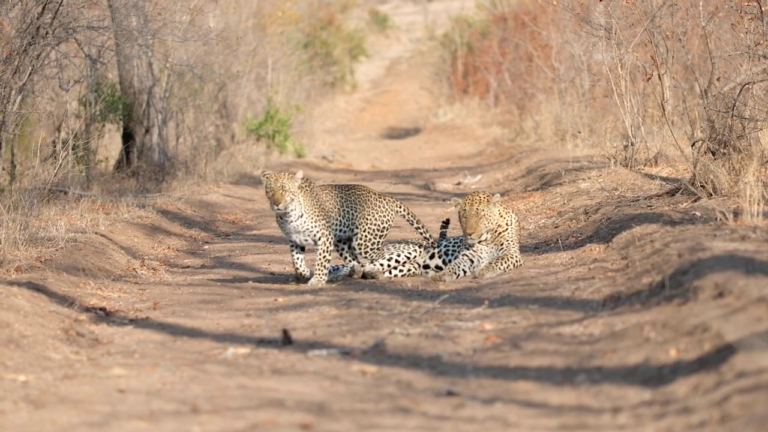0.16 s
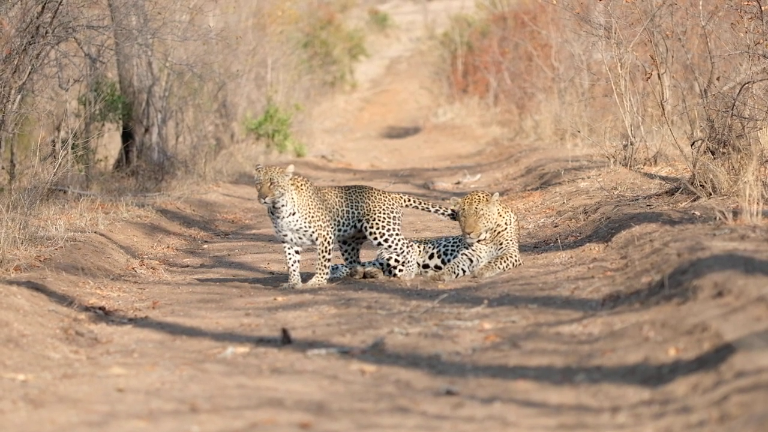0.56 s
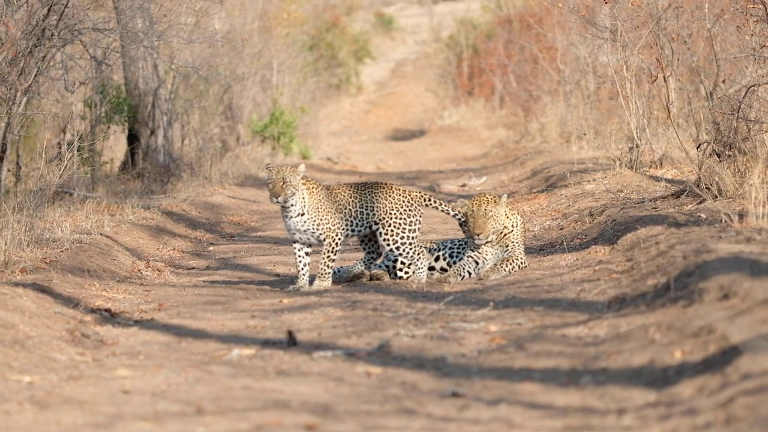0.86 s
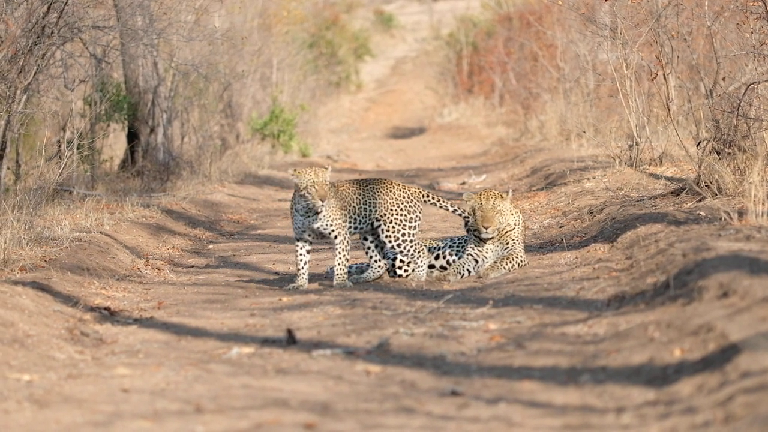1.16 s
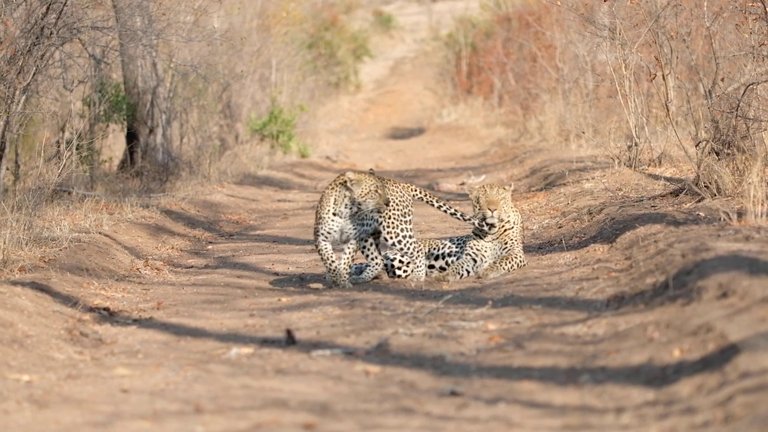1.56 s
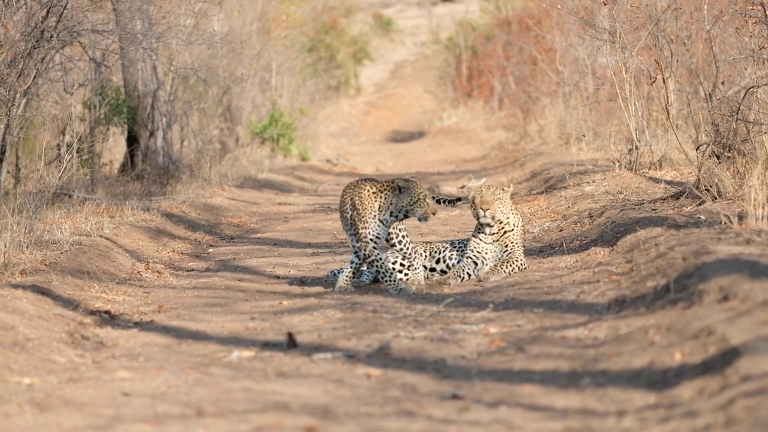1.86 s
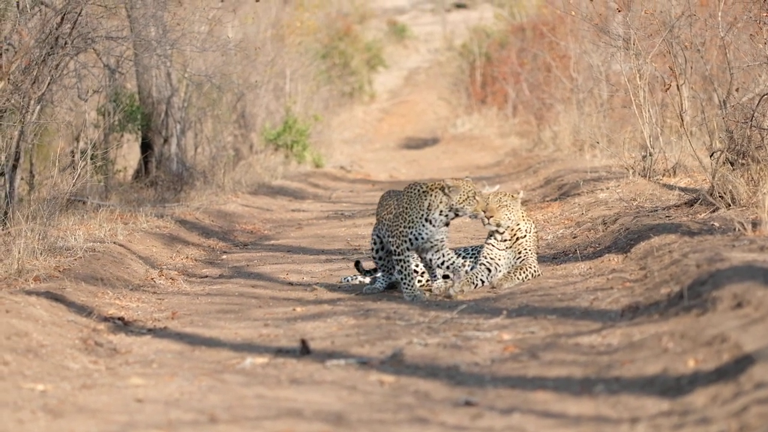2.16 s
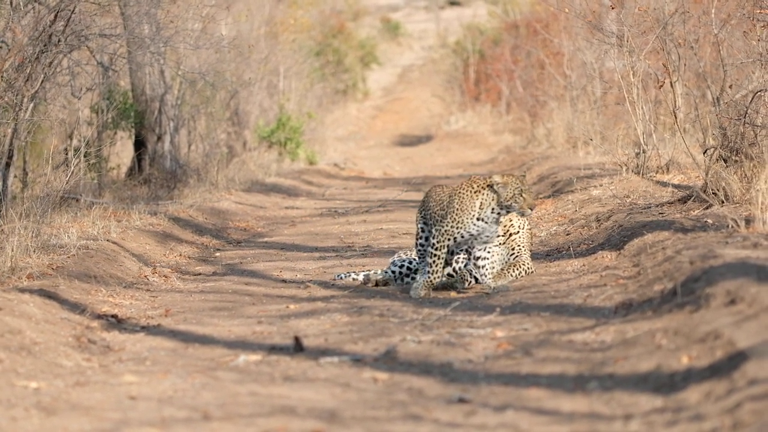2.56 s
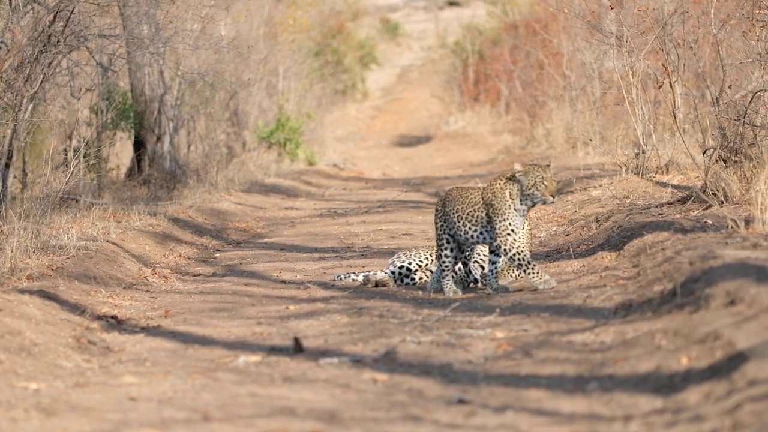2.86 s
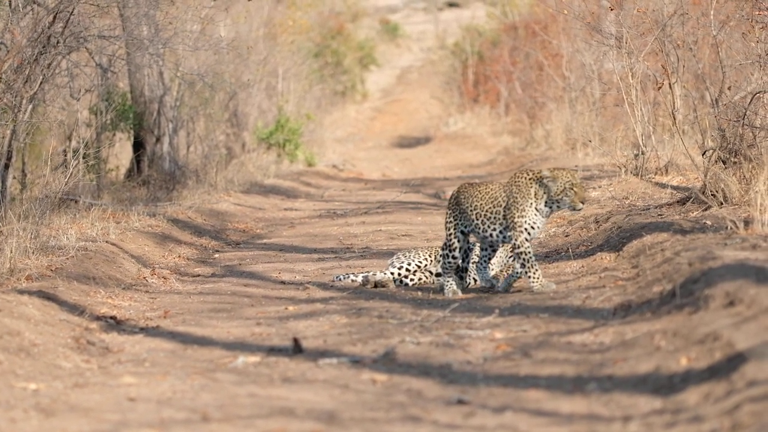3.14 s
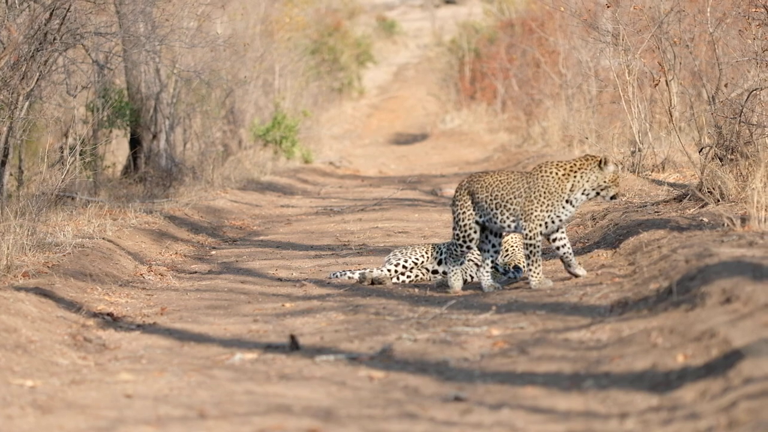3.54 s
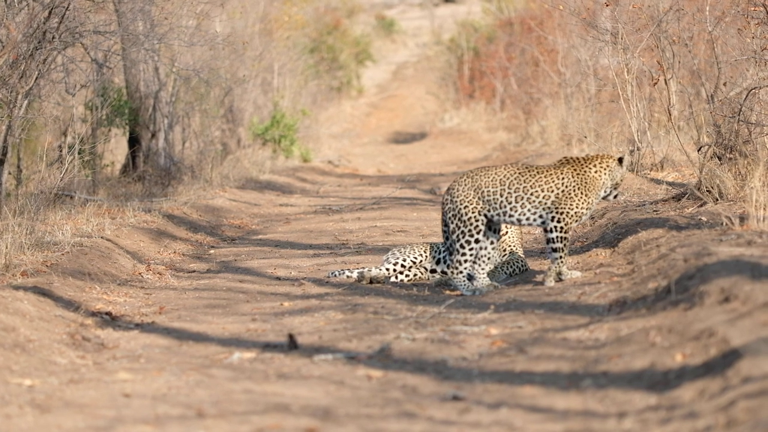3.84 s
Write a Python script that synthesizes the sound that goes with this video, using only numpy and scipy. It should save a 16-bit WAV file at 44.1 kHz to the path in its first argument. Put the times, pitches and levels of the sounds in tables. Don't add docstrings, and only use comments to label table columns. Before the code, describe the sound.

A leopard growls on a dry bush track: distinct low, chesty throat beats with open-mouth rasp from 0 to 1.3 s, a quick grunt near 1.55 s, then a slightly lower growl from 1.95 to 2.85 s. A close camera button clicks at 0.7 s; shutter bursts clatter at 0.85-1.2 and 1.8-2.2 s. Soft wind puffs become strong, mostly left-sided microphone buffeting after 2.9 s, over faint hiss and tiny bird chirps.

```python
import sys
import numpy as np
from scipy import signal
from scipy.fft import rfft, irfft
from scipy.io import wavfile

SR = 44100
rng = np.random.default_rng(int(sys.argv[2]) if len(sys.argv) > 2 else 0)


def wav_out(sig):
    wavfile.write(sys.argv[1], SR, np.round(np.clip(np.atleast_2d(sig).T, -1, 1) * 32767).astype(np.int16))


def voltage_ratio(decibels):
    exponent = np.asarray(decibels, float) / 20
    return 10 ** exponent


N = 176400


def rms_one(x):
    return x / np.sqrt(np.mean(x ** 2) + 1e-20)


def in_time(rows):
    s, *columns = np.transpose(rows)
    return [np.interp(np.arange(N) / SR, s, column) for column in columns]


def filtered(x, hz, kind="low", order=2):
    return signal.sosfilt(signal.butter(order, hz, kind, fs=SR, output="sos"), x)


def drift(rate):
    r = np.exp(-80 * np.pi * rate / SR)
    noise = rng.standard_normal(N // 40 + 2002)
    slow = signal.lfilter([1], [1, -2 * r, r * r], noise)[2000:]
    return np.interp(np.arange(N) / 40, np.arange(len(slow)), rms_one(slow))


def ring(x, hz, t60):
    r, w = voltage_ratio(-60 / (t60 * SR)), 2 * np.pi * hz / SR
    return signal.lfilter([0, np.sin(w)], [1, -2 * r * np.cos(w), r * r], x + 1e-18)


# (time [s], beats so far [count])
FIRST_GROWL = [(.025, 0), (.168, 3), (.293, 6), (.363, 8), (.44, 10), (.503, 11), (.845, 18), (1.079, 23),
               (1.296, 27)]
# (time [s], beats so far [count])
SECOND_GROWL = [(1.946, 0), (2.061, 2), (2.168, 4), (2.205, 5), (2.381, 8), (2.532, 11), (2.685, 14),
                (2.8, 16), (2.855, 17)]
# (time [s], beats so far [count])
GRUNT_BEATS = [
    (1.545, 0),
    (1.557, 1),
    (1.584, 2),
    (1.62, 3),
    (1.665, 4),
]
# (time [s], beat peak level [dB], open-mouth rasp level [dB])
THROAT_EFFORT = [(0, -36.5, -56), (.17, -26, -35.5), (.22, -28, -32), (.37, -20.5, -38), (.45, -30, -43.5),
                 (1.03, -27.5, -34), (1.3, -34.5, -59), (1.545, -35, -43), (1.557, -26, -35),
                 (1.585, -25, -33.5), (1.67, -63, -30), (1.95, -41.5, -35), (2.15, -41.5, -46),
                 (2.33, -36.5, -55.5), (2.5, -45, -50), (2.68, -37.5, -40), (2.86, -34, -36)]
# (frequency [Hz], level [dB], ring time t60 [s])
CHEST_MODES = [(207.6, -2.5, 0.065), (291.5, -16, 0.023), (148, -45, .05)]
# (frequency [Hz], level [dB], ring time t60 [s])
MOUTH_MODES = [(1560, -6, .025), (1900, 0, .035), (2330, -2, .025), (2750, -4, .02), (3250, -5, .018)]


def cat():
    flap_delay_s, flap_db, breath_db = .0105, -12, -40
    beat_db, rasp_db = in_time(THROAT_EFFORT)
    out = 0
    for calls, sag_share in (((FIRST_GROWL, GRUNT_BEATS), 0), ((SECOND_GROWL,), .06)):
        beats = np.zeros(N)
        for call in calls:
            s, count = np.transpose(call)
            at = (np.interp(np.arange(count[-1] + 1), count, s) * SR).astype(int)
            beats[at] = voltage_ratio(rng.standard_normal(len(at)))
        beats *= voltage_ratio(beat_db)
        puff = signal.lfilter([1], [1, -np.exp(-1 / (0.01 * SR))], beats)

        push = beats + voltage_ratio(flap_db) * np.roll(beats, int(flap_delay_s * SR))
        push = push + voltage_ratio(breath_db) * puff * rng.standard_normal(N)
        push = filtered(push, 400, order=4)
        push = filtered(push, 74, "high")
        for hz, db, t60 in CHEST_MODES:
            out = out + voltage_ratio(db) * ring(push, hz * (1 - sag_share), t60)

        rasp = voltage_ratio(rasp_db) * (beats + 0.041 * puff * rng.standard_normal(N))
        for hz, db, t60 in MOUTH_MODES:
            out = out + voltage_ratio(db) * ring(rasp, hz, t60)
    return out


def rattle(strikes, length, modes, tilt_db=0.0, rise=0.25):
    longest_ring_s, ring_cycles, detune_share, fresh_share = .016, 24, .02, .5
    u = np.arange(SR // 8) / SR / length
    shape = np.minimum(u / rise, 1) * np.exp(-np.maximum(u - 1, 0) * 2)
    sounds = 0
    for hz, db, t60 in modes:
        shared = rng.standard_normal(len(u))
        fresh = rng.standard_normal((len(strikes), len(u)))
        shake = shape * (shared + fresh_share * fresh)
        tuned_hz = hz * (1 + detune_share * rng.standard_normal())
        ringing = ring(shake, tuned_hz, min(t60, longest_ring_s, ring_cycles / hz))
        sounds = sounds + voltage_ratio(db + tilt_db * np.log2(hz / 1800)) * rms_one(ringing)
    sounds = sounds / np.abs(sounds).max(axis=1).mean()
    out = np.zeros(N + SR)
    for (s, db), sound in zip(strikes, sounds):
        start = int(s * SR)
        out[start:start + len(u)] += voltage_ratio(db) * sound
    return out[:N]


# (time the mirror drops [s], wait until the shutter [s])
CAMERA_FRAMES = [
    (.849, .016),
    (.937, .016),
    (1.026, .016),
    (1.116, .012),
    (1.770, .016),
    (1.858, .016),
    (1.947, .016),
    (2.038, .016),
    (2.128, .012),
]
# (delay [s], length [s], level over shutter [dB])
REWIND_CONTACTS = [
    (.010, .002, -15),
    (.020, .022, -19),
    (.038, .003, -15),
    (.051, .005, -12),
]
# (frequency [Hz], level [dB], ring time t60 [s])
BODY_MODES = [(856, -4, 0.017), (1020, -4, 0.023), (1340, -4, 0.024), (1818, 6, 0.033), (1916, -1, 0.036),
              (2130, 2.5, 0.0061), (2600, -50, .012), (3700, -8.5, 0.013), (4170, -14.5, 0.0035),
              (5360, -7, 0.011), (7420, -17.5, 0.0065), (9070, -23, 0.012), (11000, -31.5, 0.0024),
              (378, -9, 0.022)]
# (frequency [Hz], level [dB], ring time t60 [s])
BUTTON_MODES = [(671, 5, 0.018), (1310, 0, 0.0077), (2230, -5.5, .012), (2640, -13.5, .01),
                (4380, -8, 0.0072), (6300, -13, .004)]


def camera():
    shutter_db, pan_db, lag_s, echo_db = -29, 2, .0001, -12
    openers = CAMERA_FRAMES[0:5:4]
    running = [row for k, row in enumerate(CAMERA_FRAMES) if k not in (0, 4)]
    mirrors = [(s, -33) for s, gap in running]
    shutters = [(s + gap, shutter_db) for s, gap in running]
    first_shutters = [(s + gap, shutter_db - 4) for s, gap in openers]
    dry = rattle(mirrors, .005, BODY_MODES, 1.5)
    dry += rattle(shutters, .003, BODY_MODES, -2.0, rise=1)
    dry += rattle(first_shutters, 0.0015, BODY_MODES, -1.04)
    for delay, length, db in REWIND_CONTACTS:
        strikes = [(s + gap + delay, shutter_db + db) for s, gap in CAMERA_FRAMES
                   if gap > .015 or delay < .015]
        dry += rattle(strikes, length, BODY_MODES, -0.63, rise=0.2)
    dry += rattle([(.685, -35)], 0.004, BUTTON_MODES)

    echoes = [[np.roll(dry, int(lag * SR)) for lag in rng.uniform(.0005, .009, 5)] for _ in range(2)]
    near = np.array([dry, np.roll(dry, int(lag_s * SR))]) * voltage_ratio([[pan_db / 2], [-pan_db / 2]])
    return near + voltage_ratio(echo_db) * np.sum(echoes, axis=1)


# (time [s], level [dB], left over right [dB])
GUST_LEVELS = [(0.0, -50.5, -10), (0.5, -37.5, -12.5), (0.98, -47, -13.5), (1.26, -55, 16), (1.47, -57, -2),
               (2.03, -65.5, -4), (2.46, -50.5, -16.5), (3.11, -37, 10), (3.25, -40, 29),
               (3.3, -45.5, -2.5), (3.42, -38.5, 21), (3.55, -38, 37), (3.6, -44.5, -3.5), (4.0, -22.5, 21)]


def wind():
    low_hz, high_hz, lumps_db, lumps_rate = 65, 120, 2.5, 14
    db, pan = in_time(GUST_LEVELS)
    out = np.zeros((2, N))
    for port, sign in enumerate((1, -1)):
        level = db + 0.74 + np.minimum(sign * pan, 0) + lumps_db * drift(lumps_rate)
        white = rng.standard_normal((2, N))
        dull = rms_one(filtered(filtered(white[0], high_hz, order=3), low_hz, "high"))
        bright = rms_one(filtered(filtered(white[1], 1.746 * high_hz, order=4), high_hz, "high"))
        bright_db = -9 + .5 * (level + 36)
        out[port] = voltage_ratio(level) * (dull + bright * voltage_ratio(bright_db))
    return out


# (time [s], peak level
# [dB], left over right [dB], frequency [Hz])
EDDIES = [(2.833, -32.5, 30, 154.5), (2.889, -18, 13, 118), (2.901, -21, 26, 143),
          (2.92, -21.5, 15, 142), (2.939, -22, 13, 140), (2.997, -29, 10.0, 106),
          (3.061, -28.5, 41, 136), (3.131, -27, 18, 110.6), (3.17, -32.5, 3.5, 184),
          (3.194, -21, 25, 105.8), (3.23, -25, 35, 105.3), (3.304, -36.5, -6, 173),
          (3.417, -25, 35, 113.4), (3.452, -22, 31, 113.5), (3.465, -24.5, 18, 113.3),
          (3.51, -17.5, 38, 152.7), (3.543, -25, 31, 115.4), (3.568, -34, 20.5, 115.7),
          (3.668, -21.5, 5, 122.3), (3.692, -11.5, 21.5, 170.6), (3.754, -18, 24, 111.5),
          (3.771, -13.5, 24, 163), (3.804, -16.5, 31.5, 173), (3.87, -24, 32, 150),
          (3.904, -24, 27, 176), (3.943, -12, 40, 199), (3.955, -15.5, 25.5, 130.4),
          (3.969, -20.5, 32, 209), (3.985, -12.5, 29, 142.6),
          (0.258, -54, -2, 61.6), (0.26, -31.5, 12, 75.7), (0.354, -27, -4.0, 78.7),
              (0.433, -22.5, -33, 127.7), (0.518, -21, -36, 94), (0.592, -34, -10.5, 92),
              (0.746, -28.5, -23, 103.2), (0.879, -31.5, -24, 108.3), (0.976, -36, -15.5, 89),
              (1.266, -28, 24, 107.7), (1.473, -34, -20.0, 81.4), (2.088, -45, 11, 61.9),
              (2.439, -28.5, -13.5, 67.7)]


def eddies():
    swing_cycles, edge_cycles = 0.77, 0.43
    out, t = np.zeros((2, N)), np.arange(N) / SR
    swirls = EDDIES
    for (s, db, pan, hz), turns in zip(swirls, rng.random((len(swirls), 2))):
        i = slice(max(int((s - .05) * SR), 0), int((s + .1) * SR))
        u = (t[i] - s) * hz * 1.2036 - 200 / hz - .3
        angle = 2 * np.pi * (u + turns[:, None])
        edge = 0.48 * voltage_ratio(0.47 * (db + 12)) * np.exp(-(u / edge_cycles) ** 2) * np.cos(2 * angle)
        swing = np.exp(-(u / swing_cycles) ** 2) * np.cos(angle) + edge
        out[:, i] += swing * voltage_ratio(db + 1.5 + np.minimum([[pan], [-pan]], 0))
    return out


# (time [s], length [s], frequency [Hz], level [dB])
BIRD_NOTES = [
    (2.687, .05, 2990, -79),
    (3.188, 0.021, 3440, -72),
    (3.268, 0.13, 2890, -75.5),
]


def bird():
    t, out = np.arange(N) / SR, 0
    for s, length, hz, db in BIRD_NOTES:
        u = np.clip((t - s) / length, 0, 1)
        swell = np.abs(np.sin(np.pi * u)) ** .5
        tone = np.sin(2 * np.pi * np.cumsum(hz * (1 - .02 * u)) / SR)
        out = out + voltage_ratio(db + 2 * drift(20)) * swell * tone
    return out


# (frequency [Hz], level [dB])
HISS_COLOUR = [(120, -0.5), (250, -3), (400, -8), (900, -13), (2100, -22.5), (4000, -30.5), (8000, -36.5),
               (15500, -45.5)]


def air():
    hiss_db, alike = -58, 0.1
    hz = np.arange(N // 2 + 1) * SR / N + 1
    colour_hz, colour_db = np.transpose(HISS_COLOUR)
    gain = voltage_ratio(np.interp(np.log(hz), np.log(colour_hz), colour_db)) * np.minimum(hz / 120, 1)
    mid, side = irfft(rfft(rng.standard_normal((2, N))) * gain, N)
    ports = np.sqrt(1 + alike) * mid + np.sqrt(1 - alike) * side * [[1], [-1]]
    return voltage_ratio(hiss_db) * rms_one(ports)


def scene():
    return cat() + camera() + wind() + eddies() + bird() + air()


def band_limit(x):
    return signal.sosfilt(signal.butter(12, 15750, fs=SR, output="sos"), x)


def record(dry):
    mix = 1.114 * np.tanh(dry / 0.66)
    return band_limit(mix)


dry = scene()
out = record(dry)
wav_out(out)
```